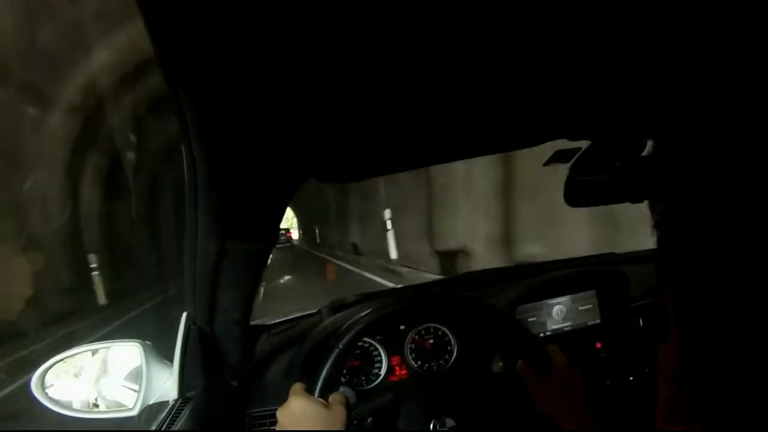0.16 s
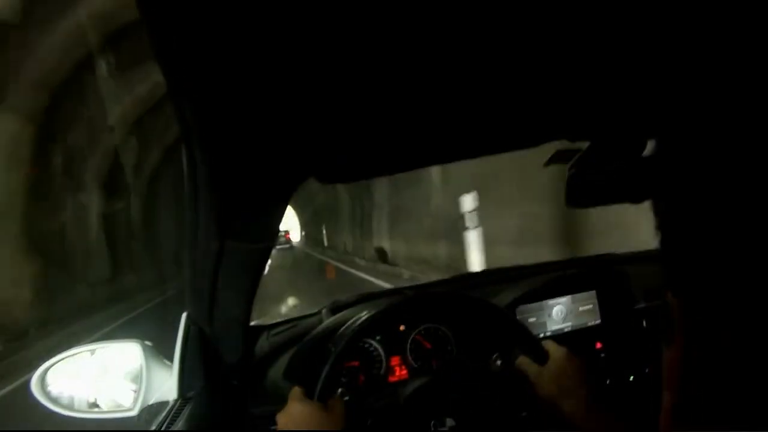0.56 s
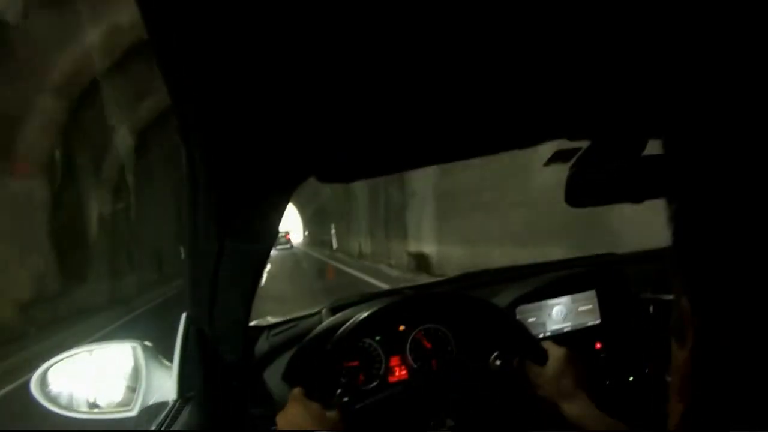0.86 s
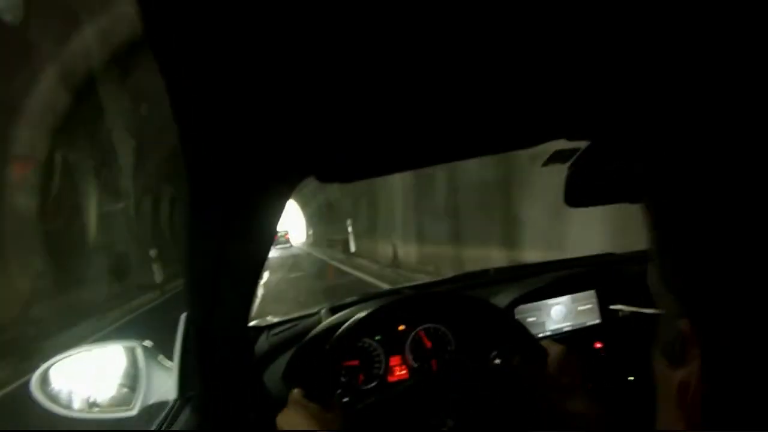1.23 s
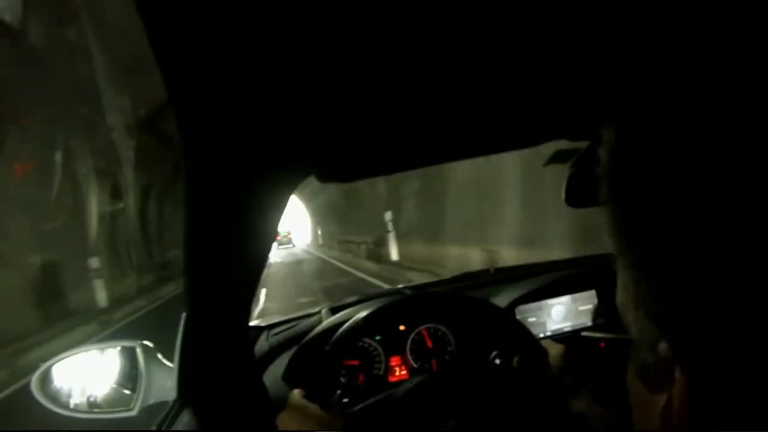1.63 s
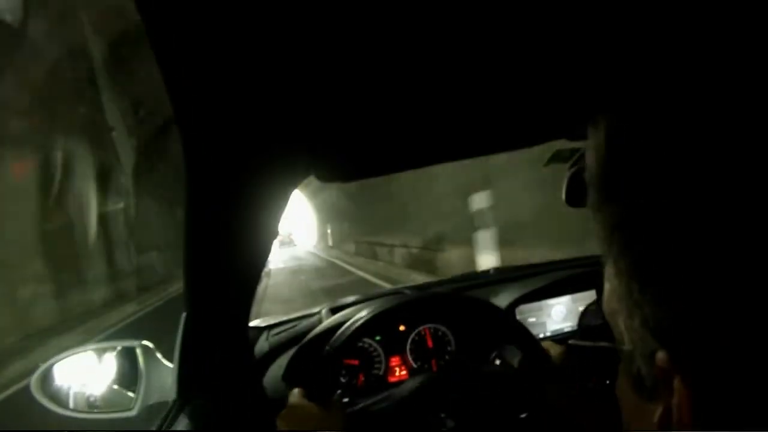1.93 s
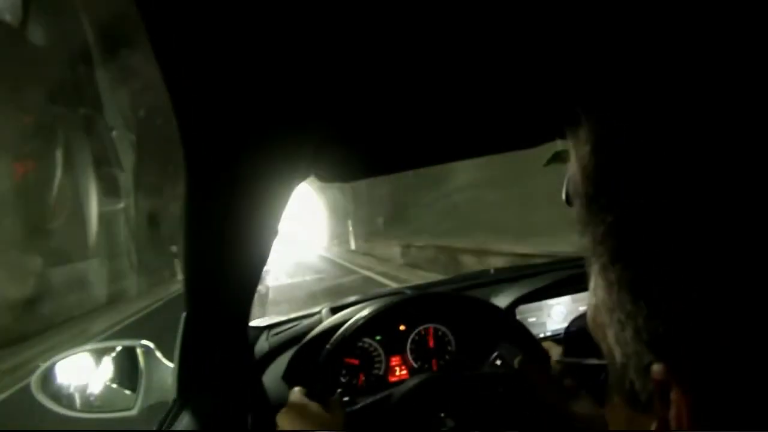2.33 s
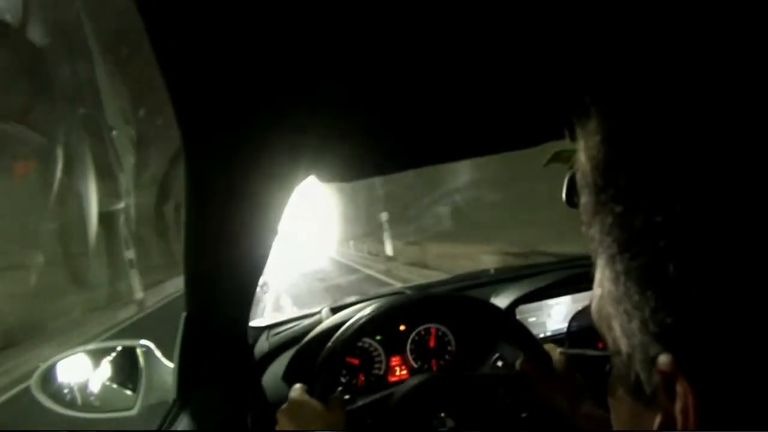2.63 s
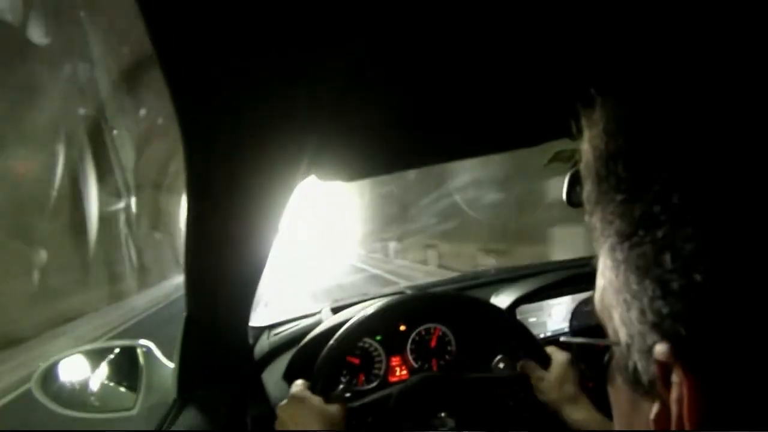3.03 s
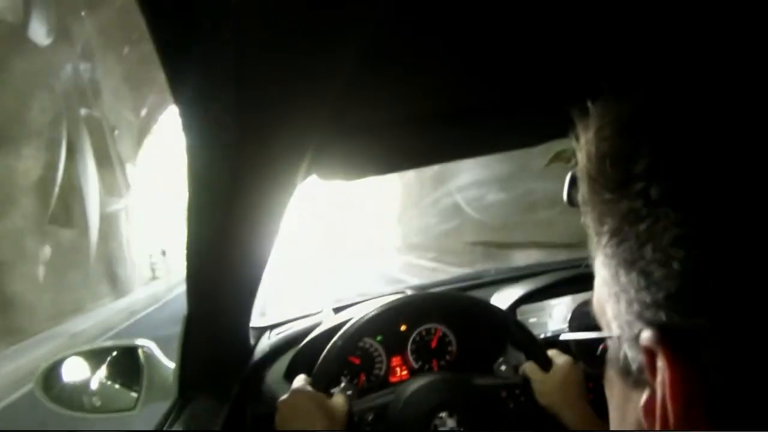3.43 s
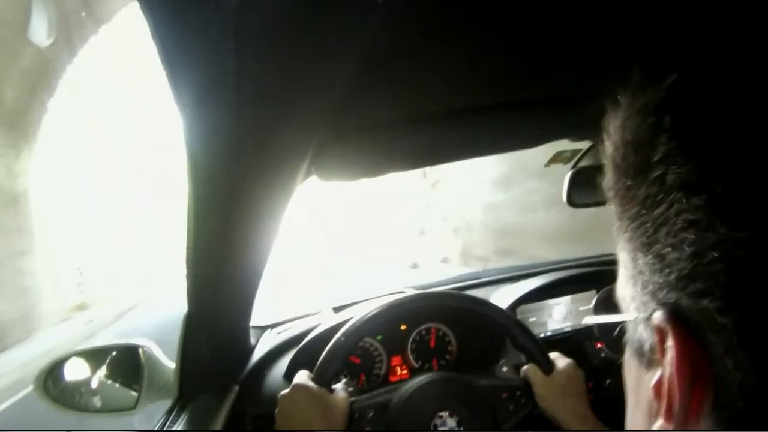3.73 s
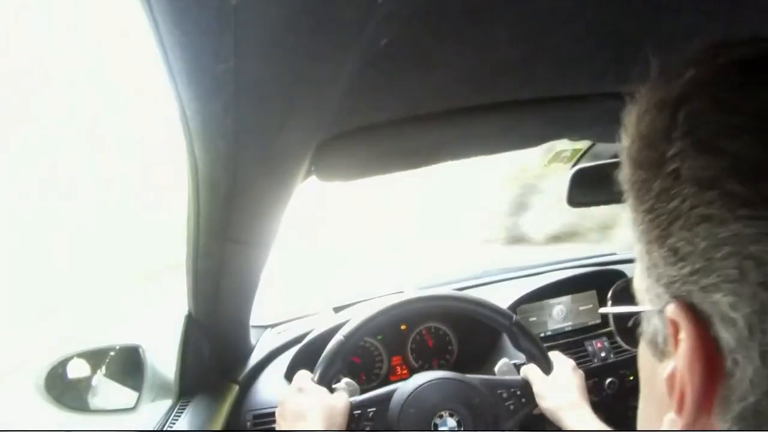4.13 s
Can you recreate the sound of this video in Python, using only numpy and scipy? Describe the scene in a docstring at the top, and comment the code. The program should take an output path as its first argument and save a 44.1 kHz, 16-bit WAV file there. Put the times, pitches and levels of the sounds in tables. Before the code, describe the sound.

A powerful sports car accelerates through a road tunnel, heard from the cabin with a window open. The exhaust howls and rasps, rising steadily in pitch while the tunnel smears it into a long echo. After about three seconds the throttle closes and the note sinks and softens. Tyre roar, air hiss and low wind rumble run underneath, growing rougher near the tunnel mouth with a few dull thumps of air.

```python
"""A ten-cylinder sports car pulls hard through a road tunnel, heard from the cabin, a window down.
From the start, exhaust tones sweep through pipe resonances and the tunnel smears them into a howl;
the firings rasp and snarl over wind and tyres. At 1 s the treble surges and air thumps in the cabin.
The intake fizzes as the revs peak near 3 s; then the throttle closes and the pitch sinks. Toward the
tunnel mouth the air roughens and thumps again, and just after 4 s the walls begin to fall away."""
import sys
import numpy as np
from scipy import signal
from scipy.fft import rfft, irfft, next_fast_len
from scipy.io import wavfile
from scipy.ndimage import uniform_filter1d, minimum_filter1d, map_coordinates

SR = 44100
rng = np.random.default_rng(int(sys.argv[2]) if len(sys.argv) > 2 else 0)


def int16_out(signal):
    """Quantize to a 16-bit WAV file."""
    q = np.round(np.clip(np.atleast_2d(signal).T, -1, 1) * 32767)
    wavfile.write(sys.argv[1], SR, q.astype(np.int16))


N = 188262
TIME = np.arange(N) / SR
CYLINDERS, REF_FIRING_HZ = 5, 203.4  # per bank; the pivot for levels that grow with the revs
ROAD_DB_PER_S = 0.73  # boom and tyres build as the car gathers speed


def amp(db):
    """Decibels to gain."""
    return 10 ** (np.asarray(db) / 20)

def along(points, hz):
    """Read (frequency, value) points on a log frequency axis."""
    f, values = np.transpose(points)
    return np.interp(np.log(hz + 1), np.log(f + 1), values)

def envelope(points):
    """Join (time, value) points into one value per sample."""
    return np.interp(TIME, *np.transpose(points))

def wobble(rate, size=4096):
    """Smooth random modulation, rate knots a second."""
    knots = N * rate / SR
    coarse = map_coordinates(rng.standard_normal(int(knots) + 4), [np.linspace(0, knots, size)])
    return np.interp(np.arange(N), np.linspace(0, N, size), coarse)

def unit(x):
    """Scale to rms 1."""
    return x / np.sqrt(np.mean(x ** 2) + 1e-20)

def filtered(x, response):
    """Pass x through a complex frequency response."""
    m = next_fast_len(N + SR // 2)
    return irfft(rfft(x, m) * response(np.fft.rfftfreq(m, 1 / SR)), m)[:N]

def eq(x, curve):
    """Colour x with an EQ curve of (f/Hz, level/dB) points."""
    return filtered(x, lambda hz: amp(along(curve, hz)))

def rush(curve, gate=1):
    """Noise, chopped by an optional gate and coloured by an EQ curve, at rms 1."""
    return unit(eq(gate * rng.standard_normal(N), curve))

def tone(phase, flutter_db, jitter_rad):
    """A sine that wavers in level and timing."""
    level = np.sqrt(2) * amp(flutter_db * wobble(21.82))
    return level * np.sin(phase + rng.uniform(0, 2 * np.pi) + jitter_rad * wobble(35))


# Rev curve, the firing rate of one bank: t/s, f/Hz
REVS = [(0, 121.3), (.25, 128.2), (.5, 136.2), (.75, 145.6), (1, 156.3), (1.25, 166.6), (1.5, 176.3),
        (1.75, 187.6), (2.25, 207.8), (2.75, 228.7), (2.95, 235), (3.15, 237.5), (3.5, 212.2),
        (3.75, 204.2), (4.27, 174.4)]
# Engine load as the throttle opens in two steps, holds, eases and shuts: t/s, level/dB
LOAD = [(0, -3), (.48, -7.5), (.6, 1.5), (.86, -2.5), (1, 1.5), (1.25, -1.5), (2.35, 0.5), (2.65, -0.5),
        (3.05, -5), (3.4, -16), (4.27, -22.5)]

def engine():
    """Firing rate, load and four-stroke cycle angle; each cylinder fires once per turn of the angle."""
    firing_hz = envelope(REVS)
    unsteady_hz = firing_hz * (1 + 0.0013 * wobble(25))
    angle = 2 * np.pi * np.cumsum(unsteady_hz) / SR / CYLINDERS
    return firing_hz, envelope(LOAD), angle


# Reverb time of the tunnel: f/Hz, T60/s
TUNNEL_DECAY = [(100, 3.8), (500, 2.31), (1500, 2.46), (5000, 0.84)]

def tunnel(x, bloom_s=0.087):
    """The concrete tube's long reverb, slow to bloom and already ringing when the scene begins."""
    hz, t, bands = signal.stft(rng.standard_normal(2 * SR), SR, nperseg=256)
    bloom = 1 - np.exp(-(t / bloom_s) ** 2)
    decay = amp(-60 * t / along(TUNNEL_DECAY, hz)[:, None])
    tail = signal.istft(bands * bloom * decay, SR, nperseg=256)[1]
    pre_roll = SR // 2
    primed = np.r_[x[pre_roll:0:-1], x]
    return signal.fftconvolve(primed, tail / np.linalg.norm(tail))[pre_roll:pre_roll + N]


# Resonances of the car that lift each exhaust tone: order (x cycle rate), f/Hz, width/Hz, level/dB
DRONE_SWELLS = [(4, 184, 12, -18.5), (5, 126.5, 20, -9.5), (5, 156, 13, -18), (5, 173, 12, -18),
                (5, 196, 18, -17.5), (5, 228, 19, -14.5), (6, 176, 20, -24), (7, 223, 16, -16.5),
                (7, 242, 22, -19.5), (7, 257, 15, -21), (7, 294, 11, -14), (8, 235, 19, -16),
                (8, 254, 15, -22.5), (8, 310, 16, -27), (8, 358, 55, -25), (10, 256, 26, -10),
                (10, 298, 16, -17.5), (10, 318, 18, -12.5), (10, 346, 16, -22.5), (10, 374, 20, -22.5),
                (10, 420, 20, -24.5), (10, 464, 22, -17.5), (15, 370, 18, -21), (15, 487, 42, -18.5),
                (15, 535, 62, -15), (15, 585, 70, -21), (15, 685, 90, -23), (16, 405, 18, -25),
                (16, 470, 42, -23.5), (20, 510, 25, -26), (20, 557, 31, -20), (20, 598, 32, -24),
                (20, 690, 120, -32), (25, 660, 70, -27), (25, 774, 30, -25), (25, 998, 76, -21.5),
                (30, 970, 42, -25.5), (30, 1028, 48, -24), (30, 1130, 60, -31), (30, 1280, 80, -31.5),
                (35, 1015, 36, -28), (35, 1070, 45, -29), (35, 1455, 80, -31), (40, 1030, 70, -27),
                (40, 1250, 40, -32.5), (45, 1415, 55, -30.5), (50, 1395, 40, -35), (50, 1775, 110, -35.5),
                (50, 2210, 110, -38)]

def drone(angle, firing_hz, load_db):
    """Clean, loud exhaust tones swell through resonances, trailed by an echo of their earlier pitch."""
    tones = np.zeros(N)
    for order in sorted({round(row[0]) for row in DRONE_SWELLS}):
        ratio = order / CYLINDERS
        power = sum((amp(db) / (1 + (2 * (ratio * firing_hz - hz) / width) ** 2)) ** 2
                    for k, hz, width, db in DRONE_SWELLS if round(k) == order)
        drive = amp(load_db * (0.28 if order == CYLINDERS else 1))  # the firing tone hums on off-throttle
        partial = tone(order * angle, flutter_db=0.75 * np.sqrt(ratio), jitter_rad=0.06 * np.sqrt(ratio))
        tones += drive * np.sqrt(power) * partial
    return tones + eq(tunnel(tones), [(130, -21), (300, -15), (520, -12), (700, -8.5)])


# Body of the pipes and cabin: f/Hz, width/Hz, relative level/dB
PIPE_MODES = [(175, 48, -0.5), (322.2, 22.4, 8.5), (526.4, 45, 2.5), (783, 21, -7), (1026, 55, -7),
              (1432, 51, -6.5)]

def pipes(x, cutoff_hz=3000):
    """Exhaust and cabin resonances ring; the bodywork shuts out the treble."""
    def response(f):
        modes = sum((-1) ** k * amp(db) * 1j * f * width / (hz * hz - f * f + 1j * f * width)
                    for k, (hz, width, db) in enumerate(PIPE_MODES))
        return modes / (1 + (f / cutoff_hz) ** 4)
    return unit(filtered(x, response))


# Weaker tones from unequal cylinders and pipes: order (x cycle rate), relative level/dB
HOWL_PARTIALS = [(6, -8), (9, -6.5), (11, -6), (13, -3.5), (14, -4), (18, -1), (19, 0.5), (21, -2), (24, 1),
                 (29, 3), (34, -1), (36, -2.5), (44, -4)]

def howl(angle, load_db, level_db=-22.5, reverb_db=-6):
    """Overtones flare as they sweep through the pipe resonances and hang on in the tunnel."""
    tones = sum(amp(db) * tone(round(k) * angle, flutter_db=2, jitter_rad=0.17)
                for k, db in HOWL_PARTIALS)
    voice = amp(level_db + load_db) * pipes(tones)
    return voice + amp(reverb_db) * tunnel(voice)


# Colour of the exhaust gas: f/Hz, relative level/dB
RASP_EQ = [(100, -43), (300, -32.5), (600, -2.5), (1000, -7.5), (1420, -2), (1650, -16.5), (2000, -9.5),
           (2600, -19), (3300, -23), (4300, -25), (7000, -62.5), (14000, -80.5)]

def rasp(angle, firing_hz, load_db, db_per_octave=7.5, reverb_db=-2):
    """Every firing blows a puff of turbulent gas, harder with revs and load."""
    level_db = -31 + 0.4 * load_db + db_per_octave * np.log2(firing_hz / REF_FIRING_HZ)
    puffs = ((1 + np.cos(CYLINDERS * angle)) / 2) ** 2
    imbalance = 1 + 0.12 * np.cos(angle)  # the cylinders differ in strength
    gas = amp(level_db + 0.25 * wobble(23)) * rush(RASP_EQ, puffs * imbalance)
    return gas + amp(reverb_db) * tunnel(gas)


def slap(x, paths=4, t60_s=0.1, changes_per_s=9):
    """Early reflections off the passing wall and road: overtones flare and fade as the paths shift."""
    decay = amp(-60 * TIME[:SR // 16] / t60_s)
    shares = np.array([wobble(changes_per_s) for _ in range(paths)])
    shares /= np.linalg.norm(shares, axis=0)
    echoes = [signal.fftconvolve(x, rng.standard_normal(len(decay)) * decay)[:N] for _ in range(paths)]
    return unit(np.sum(shares * echoes, axis=0))


# Metallic midrange bite of the firings: f/Hz, relative level/dB
SNARL_EQ = [(600, -41.5), (900, -5), (1300, 0.5), (1650, 0), (2050, -1), (2350, -7), (2650, -6),
            (3200, -11), (4200, -29.5), (6000, -71)]

def snarl(angle, firing_hz, load_db, drift=0.3, db_per_octave=12.5, reverb_db=-7):
    """Each cylinder cracks its own way, much the same every cycle: a dense comb of metallic overtones."""
    def pattern(size=256):  # a random, flat-spectrum wavetable, looped once per cycle
        table = unit(irfft(np.exp(2j * np.pi * rng.random(size // 2 + 1))))
        return map_coordinates(table, [angle / (2 * np.pi) * size % size], mode="grid-wrap")
    cracks = pattern() + drift * (wobble(9) * pattern() + wobble(14) * pattern())
    ring = sum(tone(k * CYLINDERS * angle, flutter_db=3, jitter_rad=0.3) for k in range(8, 13))
    comb = slap(unit(cracks) + amp(-14.5) * unit(ring))
    level_db = -29 + 0.6 * load_db + db_per_octave * np.log2(firing_hz / REF_FIRING_HZ)
    voice = amp(level_db) * unit(eq(comb, SNARL_EQ))
    return voice + amp(reverb_db) * tunnel(voice)


# Airy top end at the window: f/Hz, relative level/dB
HISS_EQ = [(2000, -2), (3500, 4), (4500, 1.5), (5600, 0.5), (6600, -3.5), (7800, -10), (9500, -12.5),
           (11000, -16), (15000, -23.5)]
# Fader ride on the hiss, ahead of its trim: t/s, level/dB
HISS_RIDE = [(0.0, -48.5), (0.4, -50), (1.15, -48.5), (1.44, -49.5), (2.74, -43.5), (3.17, -47.5),
             (3.9, -49), (4.12, -51), (4.22, -53.5)]

def hiss(trim_db=3):
    """Air hisses past the open window."""
    return amp(envelope(HISS_RIDE) + trim_db + 0.4 * wobble(8.8)) * rush(HISS_EQ)


# Sub-bass rumble of the wind: f/Hz, relative level/dB
WIND_EQ = [(8, -23.5), (22, -12.5), (32, 1.5), (42, -2.5), (70, -5.5), (95, -4.5), (130, -11), (300, -20.5),
           (3000, -100)]

def wind(mouth, level_db=-21, mouth_db=3):
    """Wind buffets the window, harder in the rough air near the tunnel mouth."""
    return amp(level_db + mouth_db * mouth + 1.4 * wobble(7.7)) * rush(WIND_EQ)


# Hollow low mids of the cabin: f/Hz, relative level/dB
BOOM_EQ = [(60, -22), (100, -7), (128, 3.5), (158, 1), (205, 10.5), (245, 0), (320, 0.5), (420, -7),
           (4000, -100)]

def cabin_boom(mouth, level_db=-22, mouth_db=1.7):
    """The cabin booms unevenly, more with speed and near the tunnel mouth."""
    return amp(level_db + ROAD_DB_PER_S * TIME + mouth_db * mouth + 2.9 * wobble(12)) * rush(BOOM_EQ)


# Broad roar of rubber on road: f/Hz, relative level/dB
TYRE_EQ = [(30, -26.5), (150, 1), (300, 3), (375, 0.5), (440, -7), (560, -0.5), (680, -1), (1000, 1.3),
           (1400, -8.5), (1650, -11.5), (2100, -15), (3200, -25.5), (12000, -85.5)]

def tyres(mouth, level_db=-24.5, mouth_db=3):
    """Tyre roar comes back off the walls, growing with speed and near the tunnel mouth."""
    return amp(level_db + ROAD_DB_PER_S * TIME + mouth_db * mouth + 0.27 * wobble(14)) * rush(TYRE_EQ)


# Low hits of air in the cabin: t/s, level/dB, f/Hz, half-width/s
AIR_THUMPS = [(1.033, -19, 70, 0.1), (1.283, -10.5, 28.8, 0.025), (3.099, -15, 82.7, 0.028),
              (3.108, -16, 40.2, 0.045), (3.4, -20, 24, .04), (3.46, -17, 45.14, 0.027),
              (4.063, -9.5, 132.9, 0.028), (4.115, -13, 35.1, 0.028), (4.17, -11.5, 140.2, 0.029),
              (4.188, -10, 215.9, 0.037)]

def thumps():
    """Short, bell-shaped swells of air pressure, a few cycles long."""
    hits = np.zeros(N)
    for peak_s, db, hz, half_width_s in AIR_THUMPS:
        swell = amp(db) * np.exp(-((TIME - peak_s) / half_width_s) ** 2)
        hits += swell * tone(2 * np.pi * hz * TIME, flutter_db=0, jitter_rad=1)
    return hits


# High sizzle of the intake: f/Hz, relative level/dB
FIZZ_EQ = [(5000, -18), (8500, -1), (11000, -3), (15000, -5.5)]

def intake_fizz(firing_hz, load_db, level_db=-55.5, db_per_octave=42):
    """Air fizzes through the open intake near the top of the revs."""
    revs_db = db_per_octave * np.log2(firing_hz / firing_hz.max())
    return amp(level_db + load_db + revs_db) * rush(FIZZ_EQ)


# Fade of the sound thrown back by the walls: t/s, level/dB
WALL_FADE = [(4.08, 0), (4.27, -3.5)]

def tunnel_exit(x):
    """The level dips as the car comes into the open and the walls stop throwing sound back."""
    return amp(envelope(WALL_FADE)) * x


def scene():
    """The mix in the cabin: revs and load drive every engine layer, over a bed of road and air."""
    firing_hz, load_db, angle = engine()
    surge = amp(2.8 * np.exp(-((TIME - 1) / 0.075) ** 2))  # a brief treble lift at 1 s
    mouth = np.clip((TIME - 3.07) / 0.8, 0, 1)  # 0 deep in the tunnel, 1 at its mouth
    tones = drone(angle, firing_hz, load_db) + howl(angle, load_db)
    grit = rasp(angle, firing_hz, load_db) + snarl(angle, firing_hz, load_db)
    treble = surge * (tunnel_exit(grit) + hiss())
    bed = wind(mouth) + cabin_boom(mouth) + tunnel_exit(tyres(mouth))
    return (tones + treble + bed + thumps() + intake_fizz(firing_hz, load_db))[None]

def record(dry, ceiling=0.73, rolloff_hz=12500, top_hz=15100):
    """A fast limiter holds the peaks down; the microphone dulls toward its band limit."""
    needed = np.minimum(1, ceiling / (np.abs(dry[0]) + 1e-9))
    held = minimum_filter1d(needed, size=400)
    gain = uniform_filter1d(uniform_filter1d(held, size=200), size=200)
    return filtered(dry[0] * gain, lambda hz: (hz < top_hz) / np.sqrt(1 + (hz / rolloff_hz) ** 12))[None]


dry = scene()
out = record(dry)
int16_out(out)
```